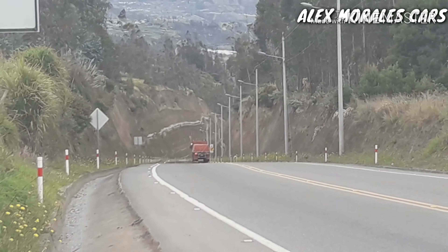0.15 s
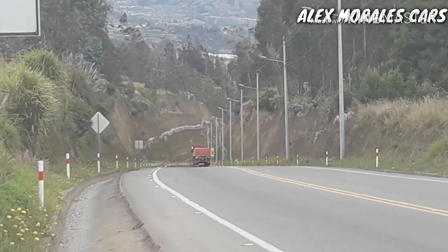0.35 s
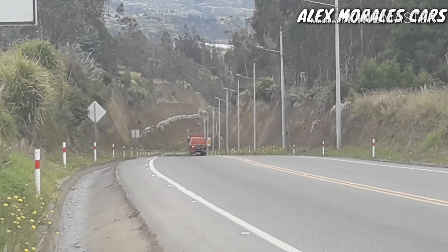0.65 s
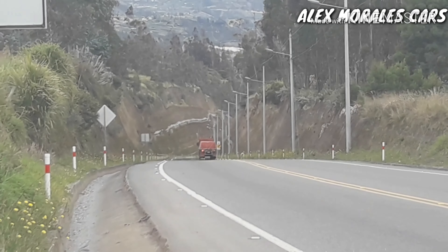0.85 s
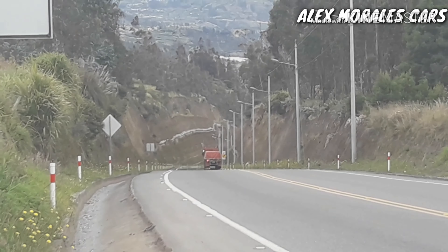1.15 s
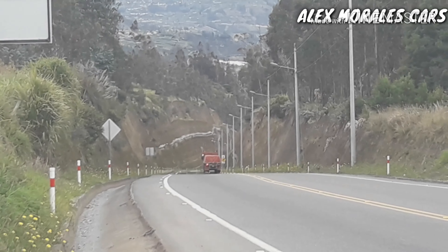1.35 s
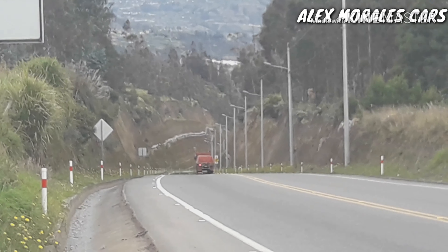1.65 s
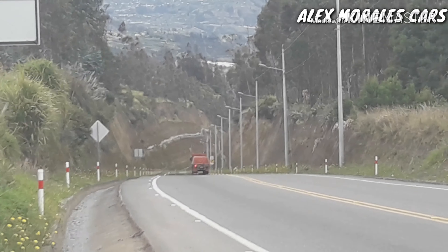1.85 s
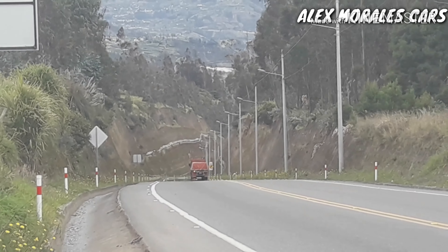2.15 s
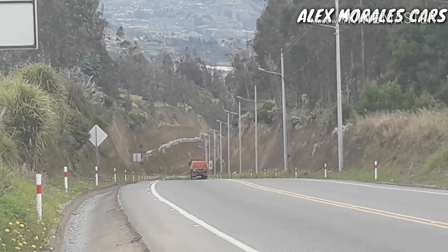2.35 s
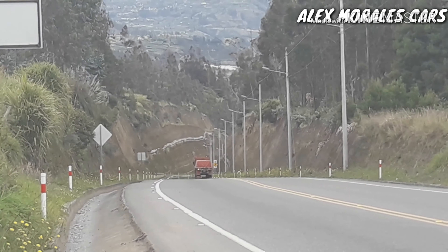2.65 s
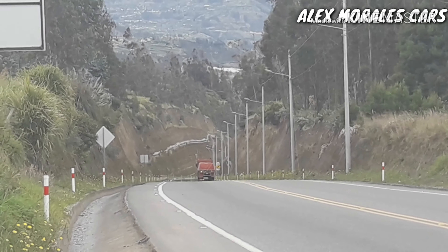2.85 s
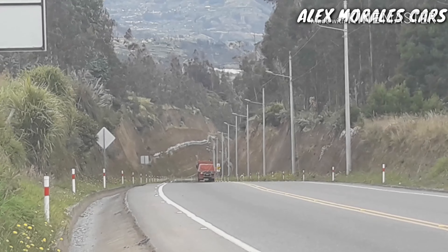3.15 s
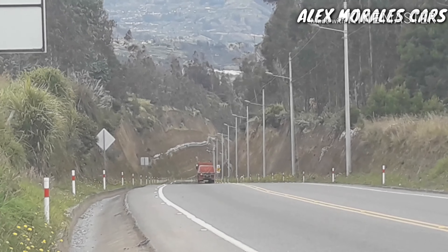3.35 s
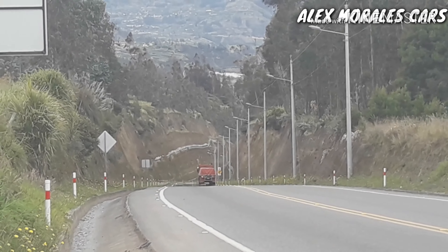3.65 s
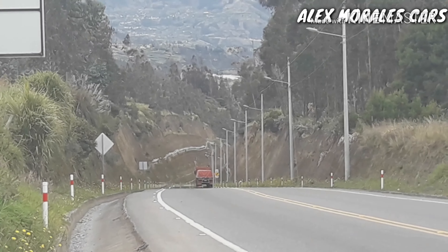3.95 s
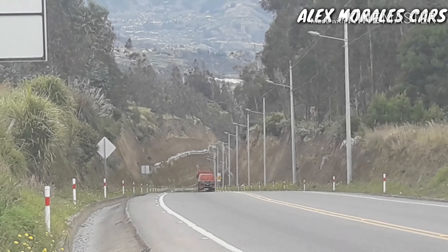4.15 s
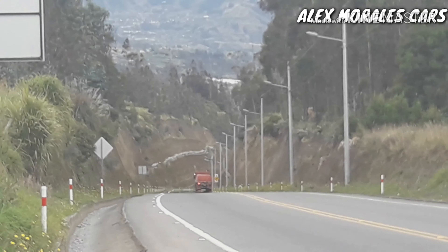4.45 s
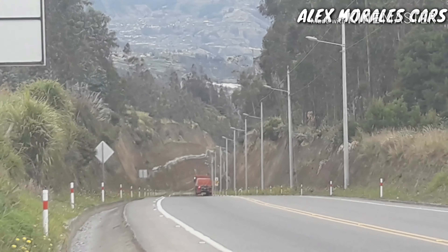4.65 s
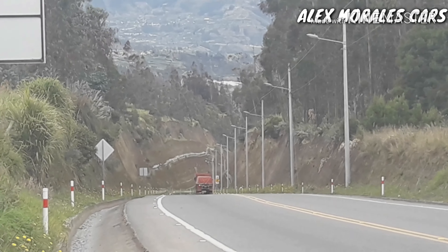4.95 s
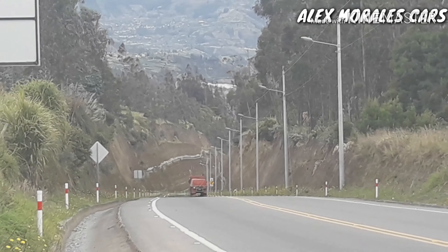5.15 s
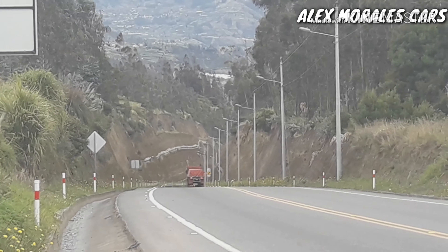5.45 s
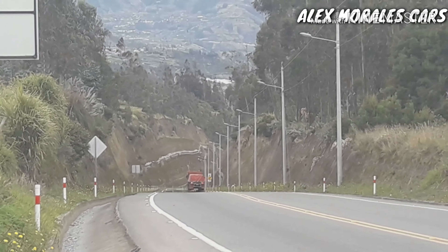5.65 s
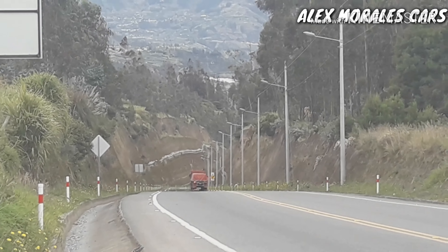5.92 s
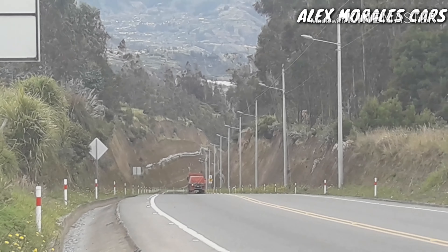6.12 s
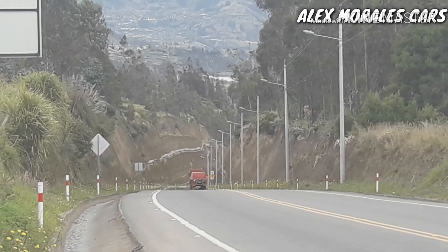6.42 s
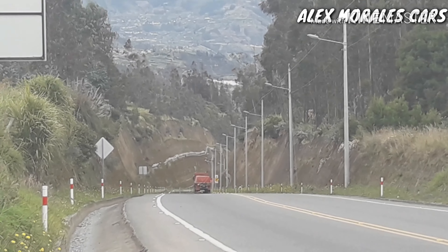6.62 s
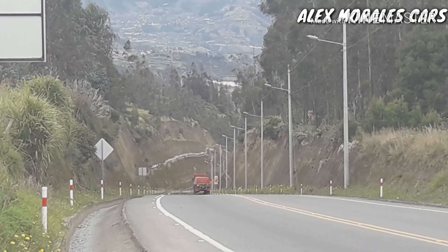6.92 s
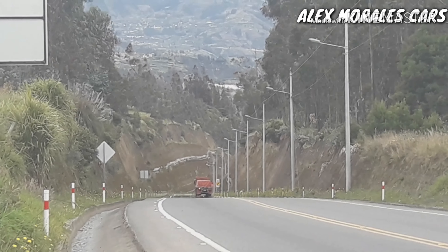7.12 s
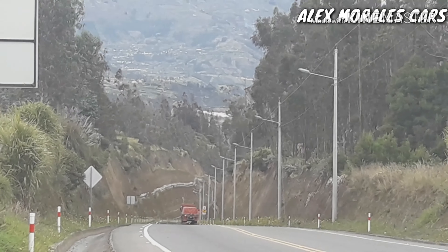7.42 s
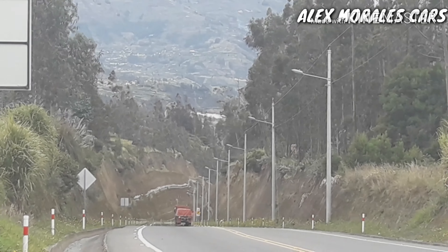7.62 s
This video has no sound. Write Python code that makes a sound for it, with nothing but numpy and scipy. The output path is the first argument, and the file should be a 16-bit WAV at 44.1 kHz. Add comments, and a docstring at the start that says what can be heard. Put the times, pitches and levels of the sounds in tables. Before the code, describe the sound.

Far down an open mountain road, a loaded diesel truck holds a low, rough engine-brake drone over soft road rumble, breeze and faint hiss. A tiny touch taps the microphone early. Past the middle the drone drops away for a gear change, a bird whistles faintly, and the drone returns higher and surging. At the very end, violent rubbing and knocks on the microphone clip harshly.

```python
"""Truck on its engine brake

A loaded diesel truck drones down a mountain road, far from the microphone, over rumble, breeze, hum and hiss.
Its drone is a sum of engine orders (tones at multiples of the cycle rate) shaped by the exhaust pipe, plus
noise in puffs. The brake lets go for a gear change and comes back at higher, surging revs.
A bird, made of falling sine tones, whistles twice. Bursts of noise and damped thumps are brushes and knocks
at the microphone: a small touch early on, and hard ones at the end that overload it."""
import sys
import numpy as np
from scipy import signal
from scipy.fft import rfft, irfft, next_fast_len
from scipy.io import wavfile
from scipy.ndimage import map_coordinates

SR = 44100
rng = np.random.default_rng(int(sys.argv[2]) if len(sys.argv) > 2 else 0)


def generate_wav(sig):
    """Save sig (samples, or channels by samples) to the path in sys.argv[1] as 16-bit PCM at SR."""
    pcm = np.round(np.clip(np.atleast_2d(sig).T, -1, 1) * 32767).astype(np.int16)
    wavfile.write(sys.argv[1], SR, pcm)


N = 343098  # length in samples

# How strong the drone's treble is. Each row: time in seconds, change of level in dB.
TREBLE_LEVEL = [(0, -6.5), (0.9, -2), (2.6, 2.5), (4.3, -8), (5.1, 2), (7.2, 3.5)]
# Colour of rubbing noise. Each row: frequency in Hz, relative level in dB when soft, the same when sharp.
RUB_COLOUR = [(12, -50, -52), (28, -58, -34), (60.6, -12, -14), (145, 1.5, -11), (270, -1.5, 0.5),
              (420, -3.5, 1), (554, -7.5, -4.5), (700, -12.5, -0.5), (1240, -24.5, -4), (2440, -46.5, -11),
              (4160, -51, -20), (5920, -61.5, -34), (8050, -74, -52.5), (12000, -81, -39.5),
              (15500, -64, -39.5)]


def gain_of(db):
    """Turns decibels into amplitude."""
    return 10 ** (np.asarray(db) / 20)


def evened(x):
    """Scales a sound to an rms (average strength) of 1."""
    return x / np.sqrt(np.mean(abs(x) ** 2) + 1e-20)


def curve(rows, t, axis=1):
    """Reads one column of a time table, joined by straight lines."""
    rows = np.array(rows, float)
    return np.interp(t, rows[:, 0], rows[:, axis])


def read(rows, hz, axis=1):
    """Reads one column of a spectrum, joined by straight lines over log frequency."""
    rows = np.array(rows, float)
    return np.interp(np.log(hz + 1), np.log(rows[:, 0] + 1), rows[:, axis])


def coloured(x, spectrum, axis=1):
    """Filters x by a spectrum and scales it to rms 1, so only the spectrum's shape matters."""
    size = next_fast_len(len(x))
    gains = gain_of(read(spectrum, np.fft.rfftfreq(size, 1 / SR), axis))
    return evened(irfft(rfft(x, size) * gains, size)[:len(x)])


def drift(t, rate_hz):
    """Smooth random wandering with an rms of about 1."""
    knots = rng.standard_normal(4096)
    return map_coordinates(knots, [t * 2 * rate_hz], order=2, mode="wrap")


def add(mix, s, sound):
    """Mixes a sound in at time s, in seconds."""
    part = mix[max(round(s * SR), 0):][:len(sound)]
    part += sound[:len(part)]


def crest_db(age, rise_db_per_s, fall_db_per_s):
    """A level that climbs to 0 dB at age 0 and then falls (a negative fall goes on rising)."""
    return np.minimum(rise_db_per_s * age, -fall_db_per_s * age)


def engine_speed(t):
    """Engine cycles per second: the mean speed plus dying swings of the drive line after each jolt."""
    # Each row: time in seconds, mean speed in four-stroke cycles per second.
    mean_speed = [(0, 17.08), (1.8, 17.08), (4.35, 16.52), (4.52, 17.35), (4.75, 17.3), (5.03, 17.68),
                  (5.7, 18.21), (7.3, 17.83)]
    # Each row: start in seconds, swing in cycles per second, period in seconds, decay time in seconds.
    jolts = [(0.115, 0.065, 1.043, 6.2), (4.488, 0.78, 0.959, 2.1)]
    speed = curve(mean_speed, t)
    for s, swing, period, decay in jolts:
        age = np.maximum(t - s, 0)
        speed = speed + swing * np.exp(-age / decay) * np.sin(2 * np.pi * age / period)
    return speed


def brake_db(t):
    """The engine brake bites quickly, holds, and dies away to the level of the coasting engine."""
    # One spell for each gear. Each row: on in seconds, off in seconds, strength in dB, trend in dB per second.
    spells = [(-0.1, 4.313, 0.76, -0.65), (4.98, 7.8, -1, 0.44)]
    bite_s, release_db_per_s, coast_db = 0.061, 117, -27
    levels = []
    for on, off, db, trend in spells:
        held = db + trend * (t - on)
        bite = coast_db * np.maximum(1 - (t - on) / bite_s, 0)
        release = release_db_per_s * np.maximum(t - off, 0)
        levels.append(held + bite - release)
    return np.maximum(np.max(levels, axis=0), coast_db)


def exhaust(fade_db=1.1, fade_hz=2.5, smear=0.18, top_hz=950):
    """Engine orders swell at the pipe's resonances; moving air fades them and wavers high ones most."""
    # Orders before the pipe. Each row: frequency in Hz, level of one order in dB.
    order_spectrum = [(100, -61), (250, -73.5), (430, -70.5), (700, -82), (850, -76), (960, -91),
                      (1200, -84.5), (1380, -97.5), (1550, -91.5), (1750, -104)]
    # Orders that unequal cylinders lift or cancel. Each row: multiple of the cycle rate, change in dB.
    uneven_orders = dict([(10, 2), (12, 8), (18, 10), (20, 3), (23, -8), (25, 1.5), (26, 3.5), (28, 5),
                          (34, 8), (38, 6), (40, 9), (46, 7), (58, 5), (59, 7), (65, 9), (71, 8), (72, 7)])
    # Pipe resonances. Each row: centre in Hz, half width in Hz, boost in dB.
    pipe = [(110.8, 3.5, 10.5), (166.7, 9.4, 11.5), (247, 6.9, 15.5), (330.9, 12.9, 15.5),
            (413.2, 26.6, 17), (444, 3.3, 7.5), (496.2, 9, 12), (579.4, 33, 15.5), (659.3, 15.6, 14.5),
            (729.6, 16, 16.5), (805, 22, 6), (1040, 26, 9)]
    odd_db = -4.4  # odd orders are weaker
    step, cylinders, scatter = 10, 6, .5  # works on every 10th sample; scatter of the phases in radians
    t = np.arange(0, N, step) / SR
    speed, treble_db = engine_speed(t), curve(TREBLE_LEVEL, t)
    angle = 2 * np.pi * np.cumsum(speed) * step / SR
    drone = np.zeros(len(t))
    for k in range(6, 98):
        hz = k * speed
        db = read(order_spectrum, hz) + odd_db * (k % 2) + uneven_orders.get(k, 0)
        db = db + sum(peak / (1 + ((hz - centre) / width) ** 2) for centre, width, peak in pipe)
        height = hz.mean() / top_hz
        db = db + treble_db * (height > 1) + fade_db * drift(t, fade_hz)
        waver = smear * (1 + 1.9 * height ** 3) * drift(t, 2 * fade_hz)
        # orders six apart keep in step and share the power among six pulses
        firing = np.pi * k ** 2 / cylinders
        # odd orders shift the timing of the pulses more than their strength
        limp = np.pi / 2 * (k % 2)
        phase = firing + limp + scatter * rng.standard_normal() + waver
        drone += gain_of(db) * np.cos(k * angle + phase)
    # a gear whine sings on through the gear change
    gear_order, whine_db, whine_fade_db = 50.5, -73.5, 3
    whine_level = gain_of(whine_db + whine_fade_db * drift(t, 2 * fade_hz))
    whine = whine_level * np.cos(gear_order * angle)
    braked = drone * gain_of(brake_db(t))
    return np.sqrt(2) * signal.resample_poly(braked + whine, step, 1)[:N]  # sqrt(2): levels above are rms


def rasp(t, top_hz=950):
    """A noisy puff of gas with each exhaust pulse; every third is stronger."""
    # Colour of the rushing gas. Each row: frequency in Hz, relative level in dB.
    gas_colour = [(60, -19), (200, -4.5), (330, 0), (450, -1.5), (650, -3), (830, -5.5), (960, -19),
                  (1220, -19.5), (1400, -30.5), (1560, -30.5), (1900, -43), (4000, -65)]
    rasp_db = -52  # before the brake's rise and fall
    puff_share, steady, uneven = .3, .35, .15  # decay as a share of the pulse gap; constant flow; unevenness
    cycles = np.cumsum(engine_speed(t)) / SR
    since_pulse = (6 * cycles) % 1  # six pulses to a cycle
    puffs = (steady + np.exp(-since_pulse / puff_share)) * (1 + uneven * np.cos(2 * np.pi * 2 * cycles))
    gas = coloured(puffs * rng.standard_normal(N), gas_colour)
    high_pass = signal.butter(6, top_hz, "high", fs=SR, output="sos")
    top = signal.sosfiltfilt(high_pass, gas)
    # only the treble follows the treble level
    return (gas + top * (gain_of(curve(TREBLE_LEVEL, t)) - 1)) * gain_of(rasp_db + brake_db(t))


def background(t, hum_waver_db=2, hum_waver_hz=1.51):
    """Noise for road rumble, breeze and faint hiss, and a wavering low sine hum beside the exhaust."""
    # Colours of the distant road, of breeze on the microphone and of the hiss.
    # Each row of these three: frequency in Hz, relative level in dB.
    rumble_colour, breeze_colour, hiss_colour = [(15, -37), (30, -22), (48, -11.5), (70, -2.5), (135, -0.5),
                                                 (200, -8), (330, -12), (430, -19.5), (520, -27.5),
                                                 (660, -22), (880, -31.5), (1000, -36), (1600, -43),
                                                 (3000, -69)], [(12, -29), (28, -1), (48, -5), (90, -2),
                                                                 (250, -38), (800, -80)], [(300, -1), (900, -7.5),
                                                                                 (1500, 3.5), (2200, 4),
                                                                                 (4200, 2), (6300, -4),
                                                                                 (8500, -6.5),
                                                                                 (11500, -0.5), (15000, 3),
                                                                                 (16000, -3)]
    # Strength of the rumble. Each row: time in seconds, rms level in dB.
    rumble_level = [(0, -45), (2.4, -47.5), (4.9, -46.5), (5.6, -45), (6.5, -49)]
    rumble = coloured(rng.standard_normal(N), rumble_colour) * gain_of(curve(rumble_level, t))

    # one gust rises quickly and dies away to a calm level
    gust_s, gust_peak_db, calm_db = 0.71, -48.5, -69
    gust_db = gust_peak_db + crest_db(t - gust_s, rise_db_per_s=40, fall_db_per_s=11)
    breeze = coloured(rng.standard_normal(N), breeze_colour) * gain_of(np.maximum(gust_db, calm_db))

    # the hum slowly rises in pitch and fades; these are its pitch and level at the start
    hum_hz, hum_rise_hz_per_s = 85.4, 0.42
    hum_db, hum_fade_db_per_s = -50, 0.54
    hum = np.sqrt(2) * np.sin(2 * np.pi * np.cumsum(hum_hz + hum_rise_hz_per_s * t) / SR)
    hum *= gain_of(hum_db - hum_fade_db_per_s * t + hum_waver_db * drift(t, hum_waver_hz))

    hiss_db = -68.5
    hiss = coloured(rng.standard_normal(N), hiss_colour) * gain_of(hiss_db)
    return rumble + breeze + hum + hiss


def brushing(edge_s=0.0028, judder_db=2, judder_hz=110, snag_share=0.5):
    """Stick-slip friction on the microphone: strokes of noise that swell and ease, juddering and snagging."""
    # Each row: start, hardest moment and end in seconds, level when hardest in dB before the soft edges,
    # rise in dB per second, fade in dB per second (negative goes on rising),
    # sharpness from 0 to 1 at first touch, the same when hardest (both are squared below).
    strokes = [(0.748, 0.755, 0.775, -53, 300, 10, 0.2, 0.2), (7.279, 7.323, 7.4, -15.5, 380, 6, 0, 0.33),
               (7.33, 7.433, 7.522, 0, 181, 53, 0.44, 0.76), (7.524, 7.535, 7.579, -17, 300, -1, 0.8, 0.72),
               (7.579, 7.58, 7.632, -35.5, 300, 10, 0.4, 0.4),
               (7.632, 7.648, 7.724, -7.5, 20, 211, 0.63, 0.84), (7.724, 7.73, 7.79, -45, 300, 1, 0.95, 1)]
    snags_per_s, margin_s = 300, .02
    out = np.zeros(N)
    for start, hardest, end, db, rise, fade, first_sharp, grip_sharp in strokes:
        t = np.arange(SR // 3) / SR + start - margin_s
        # snags are clicks at random moments
        snags = evened(rng.choice([-1, 1], len(t)) * (rng.random(len(t)) < snags_per_s / SR))
        judder = gain_of(judder_db * drift(t, judder_hz))
        slips = rng.standard_normal(len(t)) * judder + snag_share * snags
        grip_times = [start, max(hardest, start + edge_s)]
        sharp = np.interp(t, grip_times, [first_sharp, grip_sharp]).clip(0, 1) ** 2
        soft_rub, sharp_rub = coloured(slips, RUB_COLOUR), coloured(slips, RUB_COLOUR, axis=2)
        rub = evened((1 - sharp) * soft_rub + sharp * sharp_rub)
        # smooth edges where the touch begins and ends
        contact = (1 + np.tanh((t - start) / edge_s)) / 2 * (1 + np.tanh((end - t) / edge_s)) / 2
        add(out, t[0], rub * np.sqrt(contact) * gain_of(db + crest_db(t - hardest, rise, fade)))
    return out


def knocks(body_hz=210):
    """Dull, quickly damped thumps of the camera body: a decaying sine with some gritty noise."""
    # Each row: start in seconds, peak level in dB, decay time in seconds, grit from 0 to 1.
    hits = [(0.752, -32, 0.014, 0.6), (7.279, -19, 0.003, 0.05), (7.321, -6, 0.002, 0.6),
            (7.367, -5, 0.002, 0.5), (7.377, -4, 0.002, 0.8), (7.553, -5, 0.002, 0.5),
            (7.572, -8, 0.004, 0.4), (7.634, -4, 0.005, 0.9)]
    out, t = np.zeros(N), np.arange(SR // 10) / SR
    for s, db, decay, grit in hits:
        thump = np.sin(2 * np.pi * body_hz * t) + grit * coloured(rng.standard_normal(len(t)), RUB_COLOUR)
        thump *= (1 - np.exp(-t / 0.0011)) * np.exp(-t / decay)  # quick onset, then decay
        add(out, s, gain_of(db) * thump / abs(thump).max())
    return out


def bird(echo_db=-5, echo_t60=0.3, flutter_db=4.0):
    """Falling sine whistles that swell in the middle, with a fading noise echo scattered by the trees."""
    # Each row: start in seconds, length in seconds, first pitch in Hz, last pitch in Hz,
    # mid-whistle level in dB before the flutter.
    whistles = [(4.302, 0.14, 3400, 2520, -64.5), (6.858, 0.155, 3370, 2470, -70)]
    song = np.zeros(N)
    for s, length, start_hz, end_hz, db in whistles:
        u = np.linspace(0, 1, round(length * SR))  # progress through the whistle
        swell = np.sin(np.pi * u) * gain_of(db + flutter_db * drift(u * length, 31.45))
        pitch_hz = start_hz + (end_hz - start_hz) * u
        add(song, s, swell * np.sin(2 * np.pi * np.cumsum(pitch_hz) / SR))
    age = np.arange(SR // 2) / SR
    # the echo drops by 60 dB in echo_t60 seconds
    trees = rng.standard_normal(len(age)) * np.exp(-np.log(1000) * age / echo_t60)
    echo = signal.oaconvolve(song, trees / np.linalg.norm(trees))[:N]
    return song + gain_of(echo_db) * echo


def scene():
    """The far truck and the roadside, with handling noise right at the microphone."""
    t = np.arange(N) / SR
    truck = exhaust() + rasp(t)
    handling = brushing() + knocks()
    return (truck + background(t) + handling + bird())[None]


def record(dry):
    """The input clips at full scale; then a low-pass filter limits the band."""
    edge_hz = 15700
    clipped = np.clip(dry, -1, 1)
    low_pass = signal.firwin(511, edge_hz, window=("kaiser", 9), fs=SR)
    return signal.oaconvolve(clipped, low_pass[None], "same")


dry = scene()
out = record(dry)
generate_wav(out)
```